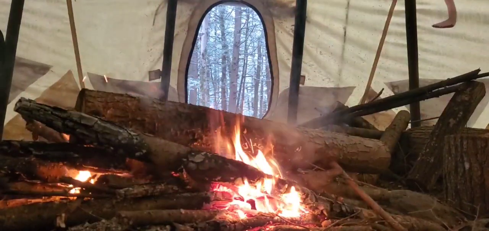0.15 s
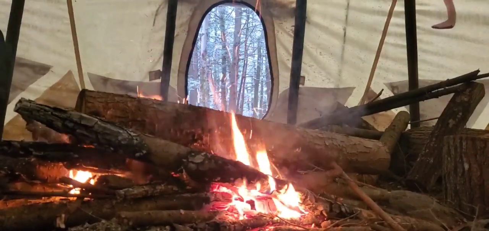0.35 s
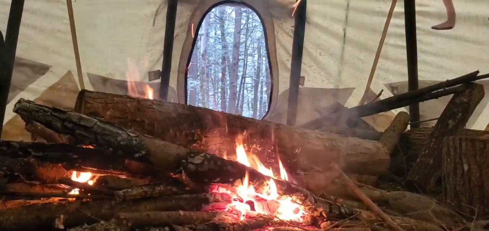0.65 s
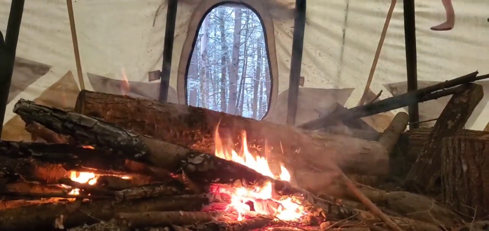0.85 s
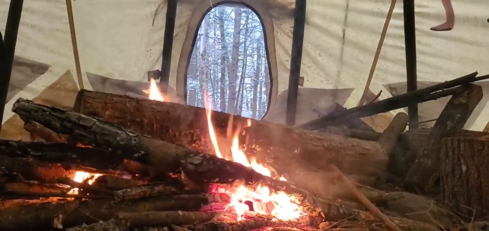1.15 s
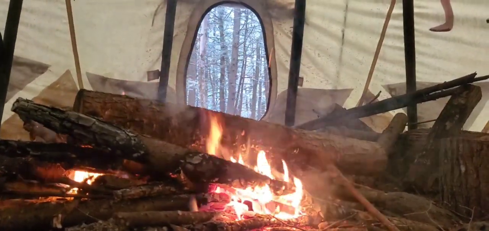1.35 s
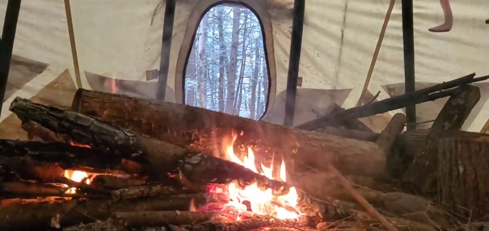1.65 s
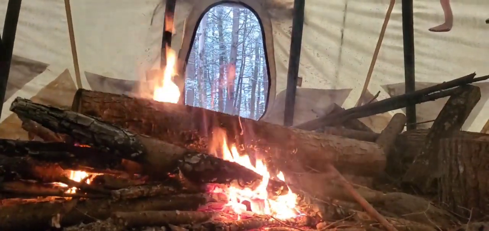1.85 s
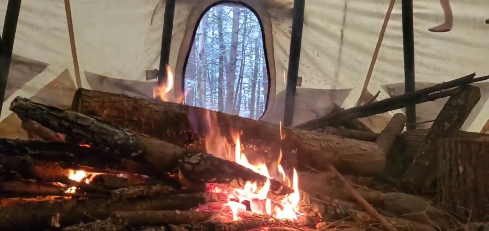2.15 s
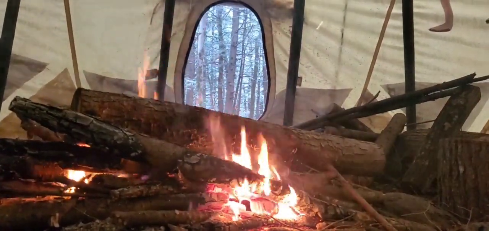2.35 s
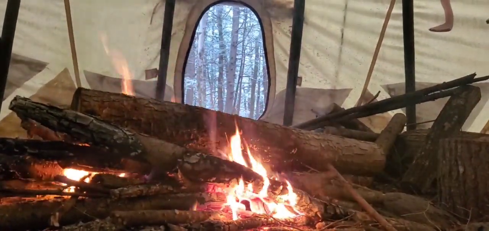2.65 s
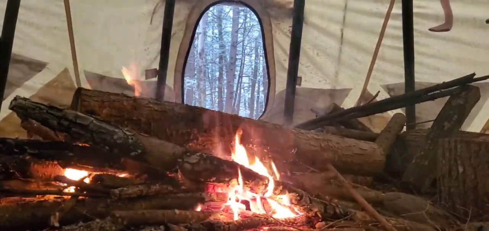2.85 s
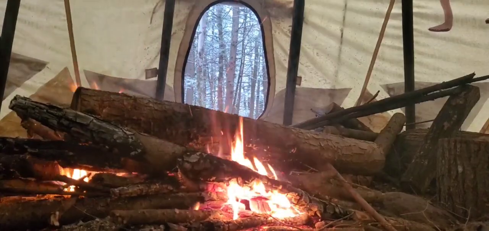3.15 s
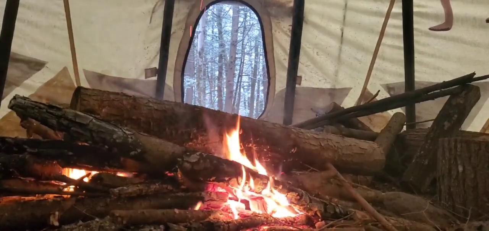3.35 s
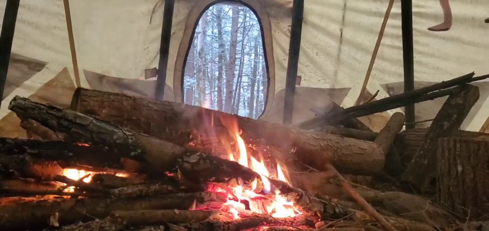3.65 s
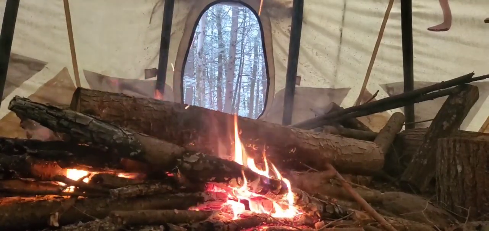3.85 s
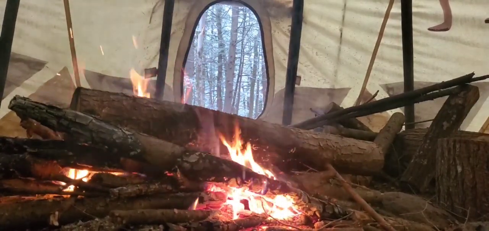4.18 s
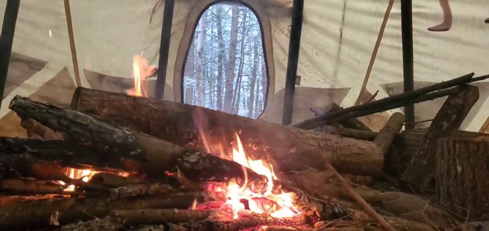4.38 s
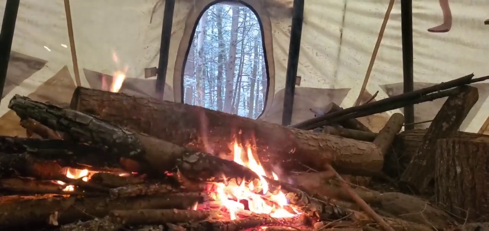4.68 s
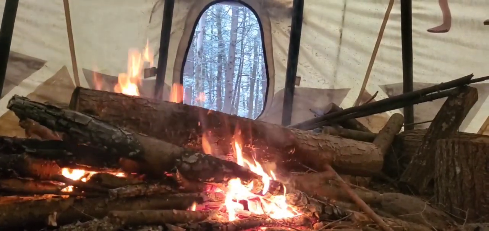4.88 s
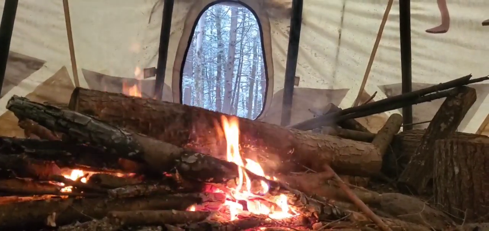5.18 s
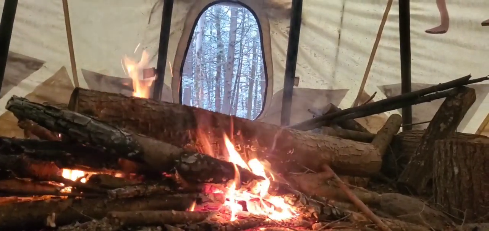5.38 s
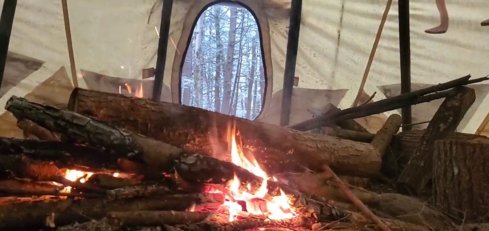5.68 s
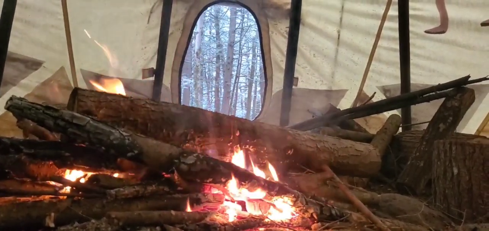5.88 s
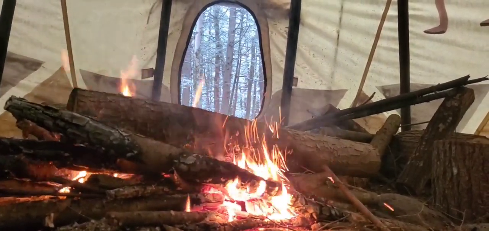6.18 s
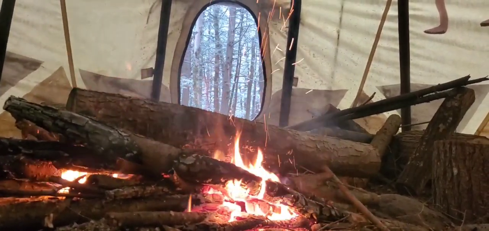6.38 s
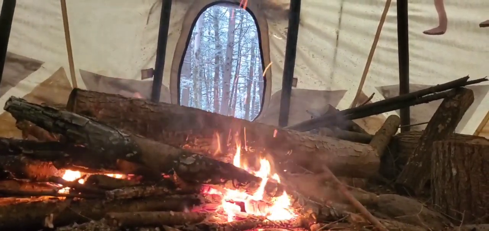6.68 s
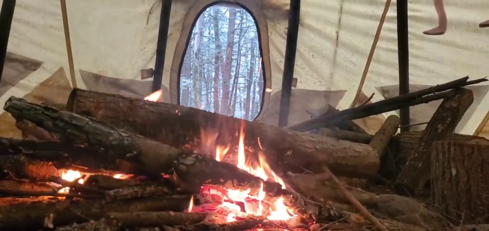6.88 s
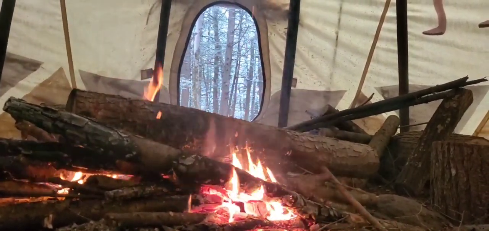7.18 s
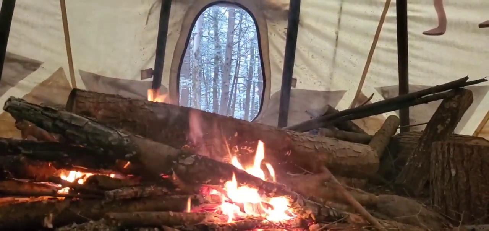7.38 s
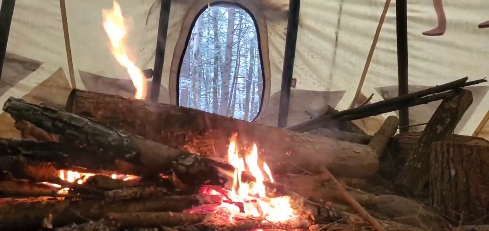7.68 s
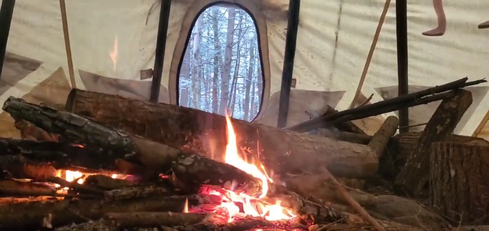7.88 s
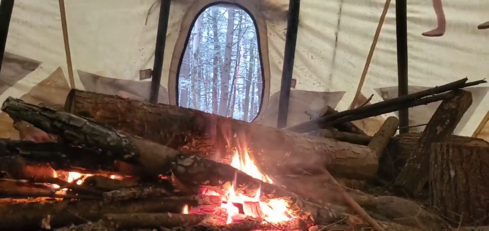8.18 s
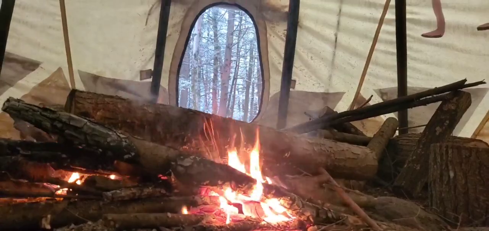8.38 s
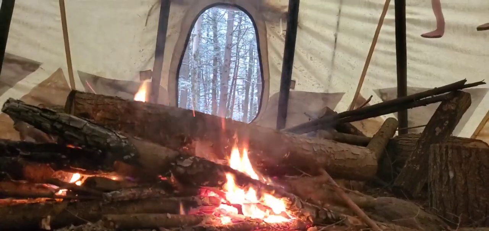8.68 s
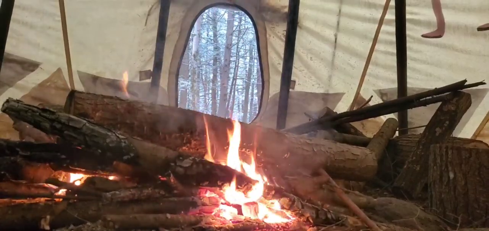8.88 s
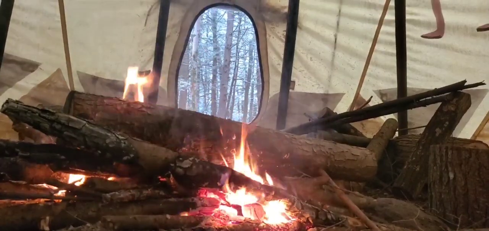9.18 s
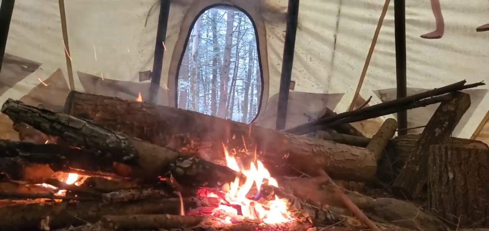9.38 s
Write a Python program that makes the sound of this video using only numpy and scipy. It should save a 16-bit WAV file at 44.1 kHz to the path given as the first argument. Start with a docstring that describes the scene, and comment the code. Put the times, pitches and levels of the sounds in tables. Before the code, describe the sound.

Burning logs snap and pop unevenly over fine crackle and airy sizzling, while a soft, low flame rumble slowly builds.

```python
"""Logs burn on an open hearth in a canvas tent, heard by two microphones close to the embers.
From the start, sap pockets burst as pops over small crackle and the hiss of escaping gas and sap.
The walls throw each pop back about 11 ms later, then blur it into a short tail.
The low flutter and roar of the flames grow over the first five seconds and hold to the end."""
import sys
import numpy as np
from scipy import signal
from scipy.fft import rfft, irfft, next_fast_len
from scipy.io import wavfile

SR = 44100
rng = np.random.default_rng(int(sys.argv[2]) if len(sys.argv) > 2 else 0)


def materialize(psi):
    """Save the field psi as 16-bit PCM at rate SR to the path in sys.argv[1].

    A 1-D psi becomes a single channel; in a 2-D psi each row is a channel.
    """
    bounded = np.clip(np.atleast_2d(psi).T, -1, 1)
    quanta = np.round(bounded * 32767).astype(np.int16)
    wavfile.write(sys.argv[1], SR, quanta)


N = 420273

THUMP_HZ, TAIL_OVER_ECHO_DB = 815, -0.5
# The big pops. Brightness is spit over thump, crack is over level, echo is the send to the walls.
# start_s, level_db, brightness_db, crack_db, echo_db, crack_pitch_hz, spit_pitch_hz
SAP_POPS = [(0.1535, -31.5, 15.5, 1.0, 2, 3360, 10900), (0.1898, -36.5, 10.5, -4, 6, 3500, 10400),
            (0.4196, -39, 5.5, 0, -5, 2480, 12400), (1.0172, -67, 19, 10.5, -13, 1800, 12800),
            (1.3396, -37.0, 31, 4, 0, 4160, 12000), (1.4597, -49, 20.0, 3.5, 1.5, 3740, 11400),
            (1.4711, -60.5, 7, -6, 17.5, 3800, 12400), (1.5199, -52.5, 26, 3.5, 1, 3230, 10200),
            (1.6234, -37.0, 18.5, 1, -6, 4300, 10300), (1.9054, -44.5, 6, -5.5, 0.5, 2320, 12800),
            (2.1014, -58.5, -1, 0.0, -4, 3400, 7200), (2.2196, -33, 7.5, 2, -5, 2750, 6600),
            (2.3903, -48.5, 16.5, 0, 2.5, 3400, 12000), (2.8256, -56, -6, -2.5, 7, 2220, 12700),
            (3.0032, -32, 17, 0.5, -2.5, 2830, 11800), (3.248, -46.5, -3, 3, -1.5, 1730, 11600),
            (3.434, -64.5, 48, 11.5, 3, 4800, 10600), (3.789, -44, 0, 0.5, 1.5, 3130, 8400),
            (3.8901, -54.5, 21, 2, -2, 4000, 11500), (3.9669, -37, 9.5, -4.5, 4.5, 3500, 10100),
            (3.9882, -37, 12, 4.5, -4.5, 3140, 9900), (4.0708, -48.5, 20, 6.5, -4, 3720, 7640),
            (4.2834, -70, 7, 13, -5, 1900, 14200), (4.4265, -59.5, 51, 8, -6.5, 5900, 11200),
            (4.8987, -36.5, 21, -2.5, -3.5, 2600, 12800), (4.9746, -46, 33, 4.5, -4.5, 3570, 9200),
            (5.2492, -31.5, 15, -4.5, -2.5, 3600, 11500), (5.2853, -37, 1, -6, -0.5, 3330, 9800),
            (5.353, -39, 2, -6, -3, 1700, 11000), (5.3733, -37.5, 9.5, -2, -6, 2290, 10400),
            (5.405, -52, 39, 11, -7.5, 4700, 9850), (5.494, -35.5, 3.5, -8, 0.5, 2540, 10200),
            (5.6235, -46.5, -4, -2.5, 4, 1620, 8700), (5.7477, -46.0, 12, -1.5, 4.5, 3000, 10400),
            (6.0244, -35.0, 8.5, -6.5, -1, 2500, 11600), (6.116, -25, 9, 0.5, 0.5, 3830, 8100),
            (6.514, -60.5, 32, 9, -2.5, 4700, 10900), (6.579, -34.5, 14.5, -1.5, -6, 3800, 10400),
            (7.1486, -59, 44.5, 5, -13, 5800, 11600), (7.2519, -50, -2, -2, 5, 2200, 10700),
            (7.2606, -37, 0.5, -16, 11.5, 2090, 12800), (7.2799, -42, 27, 5.5, -1.5, 2950, 12500),
            (7.3593, -42.5, 0.5, -10.5, 6.5, 4000, 7950), (7.618, -27.5, -2.5, 2.5, -5.5, 2130, 6600),
            (7.7311, -44.5, 8.5, 1.5, 3, 3060, 7600), (7.9001, -43.5, 4.5, 1, -2, 2760, 8800),
            (8.2799, -29.5, -0.5, -0.5, 2, 2700, 10300), (8.3558, -43.5, 2, -2, 6, 2720, 8850),
            (8.3705, -38.5, 4.5, -4, -4, 2420, 8900), (8.4311, -29.5, 18, -5, -6, 4300, 11400),
            (8.512, -60.5, 54, 11, -13, 6300, 13200), (9.0172, -48, 23, -6, -2.5, 4500, 12600),
            (9.0927, -27.0, 4.5, 2.5, 2, 3650, 7900), (9.0999, -34, 17, 7.5, 0, 3350, 6850)]
def sap_bursts():
    """Cues for the big pops: small pockets spit, big ones thump, so brightness tips the balance."""
    start_s, level_db, bright_db, crack_db, echo_db, crack_hz, spit_hz = np.transpose(SAP_POPS)
    parts_db = [level_db - bright_db / 2, level_db + crack_db, level_db + bright_db / 2]
    tail_db, thump_hz = np.full_like(start_s, TAIL_OVER_ECHO_DB), np.full_like(start_s, THUMP_HZ)
    return np.column_stack([start_s, *parts_db, echo_db, tail_db, thump_hz, crack_hz, spit_hz])


# A pop's layers (thump, crack, spit): low_hz, high_hz, tail_t60_s, tail_db, blur_share
POP_PARTS = [(150, 1180, 0.25, 4, 0.18), (1230, 7950, 0.17, 6.5, 1), (4700, 19600, 0.15, 1, 1)]
# The splitting wood's ring, down to about a third: thump_cycles, crack_cycles, spit_cycles
RING_CYCLES = [0.34, 0.34, 0.52]
# Logs shade crack and spit; the thump bends round them and takes less of a pop's echo_db.
# thump_share, crack_share, spit_share
LOG_SHADE = [0.42, 0.93, 1]
# The canvas returns the thump least well: thump_db, crack_db, spit_db
CANVAS_RETURN = [-5, -2, 0]
def pops(cues):
    """Each layer of a pop is a heavily damped ring that arrives directly and by way of the canvas."""
    starts = np.round(cues[:, 0] * SR).astype(int)
    parts_db, pitches_hz = cues[:, 1:4], cues[:, 6:]
    echo_db, tail_over_echo_db = cues[:, 4:6].T
    direct, room, t = 0, 0, np.arange(900) / SR
    for part, (low_hz, high_hz, t60_s, tail_db, blur) in enumerate(POP_PARTS):
        band = signal.butter(3, [low_hz, high_hz], "band", fs=SR, output="sos")
        cycles = pitches_hz[:, part, None] * t
        rings = signal.sosfilt(band, np.sin(2 * np.pi * cycles) * np.exp(-cycles / RING_CYCLES[part]))
        rings *= np.sqrt(.004 * SR) / np.linalg.norm(rings, axis=1, keepdims=True)  # rms 1 over 4 ms
        wall_db = LOG_SHADE[part] * echo_db + CANVAS_RETURN[part]
        sends_db = np.array([np.zeros_like(wall_db), wall_db, wall_db + tail_over_echo_db])
        gains = from_db(parts_db[:, part] + sends_db)
        sends = np.zeros((3, N + len(t)))  # direct, wall echo, tail
        for start, ring, gain in zip(starts, rings, gains.T):
            sends[:, start:start + len(t)] += gain[:, None] * ring
        near, walls = tent_paths(blur)
        direct += signal.oaconvolve(sends[:1], near, axes=1)[:, :N]
        room += signal.oaconvolve(sends[1:2], walls, axes=1)[:, :N]
        room += signal.oaconvolve(sends[2:], tent_tail(t60_s, tail_db), axes=1)[:, :N]
    return direct, room


CRACKLES_PER_S, CRACKLE_DB, CRACKLE_SPREAD_DB = 41, -63.5, 4.5
# Crackle is nearly all spit: thump_db, crack_db, spit_db
CRACKLE_BALANCE = [-31.5, -29, -6]
# It sits under the logs, so it sounds wetter: echo_db, tail_over_echo_db
CRACKLE_SENDS = [1, 4]
def small_crackle(level_db):
    """Cues for little random pops in clumps, each with its own crack and spit pitch."""
    rate = CRACKLES_PER_S * from_db(2.5 * drift(5))
    starts = np.flatnonzero(rng.random(N) < rate / SR)
    size_db = level_db[starts] + CRACKLE_SPREAD_DB * np.minimum(rng.exponential(1, N)[starts], 3)
    parts_db = size_db[:, None] + CRACKLE_BALANCE
    pitches_hz = [THUMP_HZ, 1600, 7000] * np.array([1, 4, 2]) ** rng.random((N, 3))[starts]
    sends_db = CRACKLE_SENDS + 4.2 * rng.standard_normal((N, 2))[starts]
    return np.column_stack([starts / SR, parts_db, sends_db, pitches_hz])


WALL_BLUR_MS, TAIL_RISE_MS, TAIL_PAN_DB = 1.2, 11, -5  # the tail leans right
# Arrivals from near the hearth, then from the canvas; the air swings back 2 ms after each push.
# delay_ms, left_db, right_db, polarity
HEARTH_ARRIVALS = [(0, 1.5, -3, 1), (2.1, -11, -6, -1), (6.5, -16, -13, 1)]
WALL_ARRIVALS = [(11.0, 0, 3.5, 1), (13.1, -12, -11, -1)]
def tent_paths(blur):
    """Hearth and wall responses: each arrival is part sharp, part scattered by rough surfaces."""
    t = np.arange(SR // 20) / SR
    responses = np.zeros((2, 2, len(t)))
    for response, arrivals in zip(responses, [HEARTH_ARRIVALS, WALL_ARRIVALS]):
        for delay_ms, *sides_db, polarity in arrivals:
            scatter = stereo_noise(len(t)) * np.exp(-t * 1000 / WALL_BLUR_MS)
            arrival = np.sqrt(blur) * scatter / np.linalg.norm(scatter, axis=1, keepdims=True)
            arrival[:, 0] += polarity * np.sqrt(1 - blur)
            response += from_db(sides_db)[:, None] * np.roll(arrival, round(delay_ms * SR / 1000), 1)
    return responses


def tent_tail(t60_s, level_db):
    """The tent's diffuse tail builds up as the echoes multiply, then dies."""
    t = np.arange(SR // 3) / SR
    shape = (1 - np.exp(-(t * 1000 / TAIL_RISE_MS) ** 3)) * from_db(-60 * t / t60_s)
    sides = from_db(level_db + TAIL_PAN_DB / 2 * np.array([[1], [-1]]))
    return sides * stereo_noise(len(t)) * shape / np.linalg.norm(shape)


ROAR_DB, ROAR_SWING, FLUTTER_RETURN = -66.5, 3.53, 0.36
# Tone of the deep flutter and of the roar above it: frequency_hz, density_db
FLUTTER_EQ = [(12, 3), (25, -10.5), (38, 2.5), (50, 6), (65, -1.5), (95, 0.5), (150, -7.5), (260, -15),
              (330, -26.5), (520, -34.5)]
ROAR_EQ = [(150, 16.5), (350, 2.5), (700, 5.5), (1100, -9.5), (2000, -5.5), (3500, -1)]
def flames(flame_db):
    """Low lumpy turbulence; the flutter's wall echo lifts the pitches that fit the round trip."""
    flutter = coloured_noise(FLUTTER_EQ, together_db=.5, flicker_db=1.5, rate=13.4)
    echo = np.roll(flutter, round(WALL_ARRIVALS[0][0] * SR / 1000), axis=1)
    flutter = rms_one(flutter + FLUTTER_RETURN * echo)
    roar = coloured_noise(ROAR_EQ, together_db=-0.5, flicker_db=5.0, rate=39)
    roar_db = ROAR_DB + ROAR_SWING * (flame_db - flame_db.mean())
    return from_db(flame_db + 3) * flutter + from_db(roar_db) * roar


# Tone of the hiss, bright and airy: frequency_hz, density_db
HISS_EQ = [(700, -11.5), (1400, -37.5), (1850, -5.5), (2300, -14.5), (4000, -9), (6500, -13), (8300, -2.5),
           (10000, -4.5), (12000, 0), (15800, 1.5)]
def gas_hiss(level_db):
    """Escaping gas hisses with a slight flicker."""
    return from_db(level_db) * coloured_noise(HISS_EQ, together_db=.8, flicker_db=1.3, rate=14)


SIZZLES_PER_S, SIZZLE_OVER_HISS_DB, SIZZLE_CLUMP_DB, SIZZLE_T60_CYCLES = 700, -7, 7, 11
def sap_sizzle(level_db):
    """Droplets of sap spit in clumps; each rings a few cycles high in the treble."""
    sizzle, spurts = 0, drift(14)
    for hz in np.geomspace(7000, 15000, 8):
        rate = SIZZLES_PER_S / 8 * from_db(SIZZLE_CLUMP_DB * (spurts + drift(20)))
        clicks = (rng.random(N) < rate / SR) * rng.standard_normal((2, N))
        decay, angle = from_db(-60 * hz / (SIZZLE_T60_CYCLES * SR)), 2 * np.pi * hz / SR
        poles = [1, -2 * decay * np.cos(angle), decay * decay]
        sizzle += signal.lfilter([0, np.sin(angle)], poles, clicks + 1e-18)
    return from_db(level_db) * rms_one(sizzle)


# Stereo image of flames and hiss, centred lows and wide highs: frequency_hz, left_right_correlation
STEREO_IMAGE = [(60, 0.97), (180, 1), (550, 0.76), (1650, 0.017), (15000, 0.21)]
def coloured_noise(eq, together_db, flicker_db, rate):
    """Stereo noise in octave bands that swell together and flicker apart; rms 1."""
    size = next_fast_len(N)
    hz = np.arange(size // 2 + 1) * SR / size + 1e-3
    alike = np.clip(at_hz(STEREO_IMAGE, hz), 0, 1)
    mid, side = rfft(rng.standard_normal((2, size))) * from_db(at_hz(eq, hz)) * (hz > 12)
    spectrum = np.sqrt(1 + alike) * mid + np.sqrt(1 - alike) * side * [[1], [-1]]
    noise, swell_db = 0, together_db * drift(rate / 2)
    for octave in np.arange(np.floor(np.log2(eq[0][0])), np.log2(eq[-1][0]) + 1):
        window = np.cos(np.clip(np.log2(hz) - octave, -1, 1) * np.pi / 2) ** 2
        band = irfft(spectrum * window, size)[:, :N]
        noise += from_db(swell_db + flicker_db * drift(rate)) * band
    return rms_one(noise)


def stereo_noise(size, alike_below_hz=540):
    """Wide noise; only long waves reach both microphones alike."""
    mid, side = rng.standard_normal((2, size))
    side = signal.sosfilt(signal.butter(2, alike_below_hz, "high", fs=SR, output="sos"), side)
    return (mid + side * [[1], [-1]]) / np.sqrt(2)


def drift(rate_hz):
    """A smooth random wander with spread 1."""
    pole = np.exp(-80 * np.pi * rate_hz / SR)  # one step per 40 samples
    slow = signal.lfilter([1], [1, -2 * pole, pole * pole], rng.standard_normal(N // 40 + 2002))[2000:]
    return np.interp(np.arange(N) / 40, np.arange(len(slow)), rms_one(slow))


def from_db(db):
    """Decibels to gain."""
    return 10 ** (np.asarray(db) / 20)


def rms_one(x):
    """Scale to rms 1."""
    return x / np.sqrt(np.mean(x ** 2) + 1e-30)


def at_hz(points, hz):
    """Read a curve on a log-frequency axis."""
    points_hz, values = np.transpose(points)
    return np.interp(np.log(hz), np.log(points_hz), values)


def low_pass(x, hz):
    """A steep cut of the top."""
    return signal.sosfilt(signal.cheby2(14, 60, hz, fs=SR, output="sos"), x)


HEARTH_SPOTS, SOFT_TOP_HZ = 3, 16200  # each spot scatters its pops in its own way
# Fader rides for the blaze: time_s, flame_db, hiss_db
BLAZE_FADERS = [(0.0, -60, -50), (0.5, -58, -54), (1.64, -55, -49.5), (2.25, -52, -49),
                (3.08, -50.5, -46.5), (3.85, -50, -48.5), (4.5, -52.5, -49.5), (5.2, -48.5, -49),
                (5.9, -49, -46.5), (7.19, -48.5, -45.5), (7.4, -48, -54), (8.0, -48, -47.5),
                (8.92, -48.5, -48), (9.53, -47.5, -48.5)]
def scene():
    """Pops and crackle in the tent over flames and hiss; crackle and sizzle ride with the hiss."""
    time_s, *faders = np.transpose(BLAZE_FADERS)
    flame_db, hiss_db = [np.interp(np.arange(N) / SR, time_s, fader) for fader in faders]
    cues = np.vstack([sap_bursts(), small_crackle(CRACKLE_DB + hiss_db - hiss_db.mean())])
    direct, room = sum(np.array(pops(cues[spot::HEARTH_SPOTS])) for spot in range(HEARTH_SPOTS))
    hiss = gas_hiss(hiss_db) + sap_sizzle(hiss_db + SIZZLE_OVER_HISS_DB)
    mix = direct + room + hiss + flames(flame_db)
    # the treble is cut at 16.2 kHz; a faint top from the direct pops is mixed back in
    faint_top = signal.sosfilt(signal.butter(8, SOFT_TOP_HZ, "high", fs=SR, output="sos"), direct)
    return low_pass(mix, SOFT_TOP_HZ) + from_db(-8) * faint_top


def record(dry):
    """The capsules ring a little near 8.5 kHz, peaks are rounded, the top is cut."""
    ring = signal.lfilter(*signal.iirpeak(8500, 4.0, fs=SR), dry)
    rounded = .95 * np.tanh((dry + .6 * ring) / .95)
    return low_pass(rounded, hz=16974)


dry = scene()
out = record(dry)
materialize(out)
```